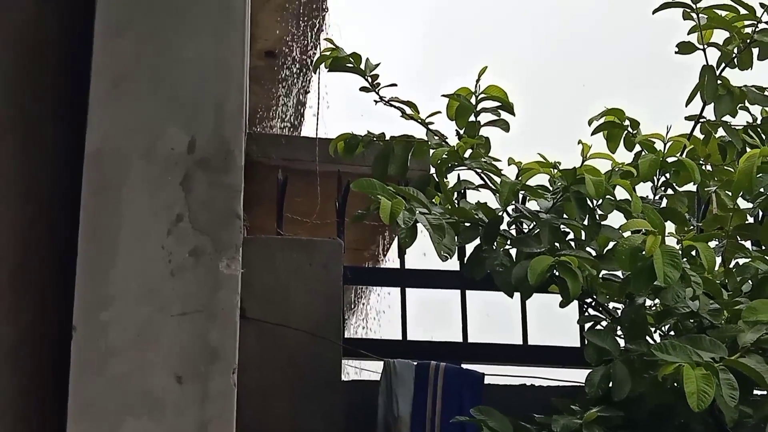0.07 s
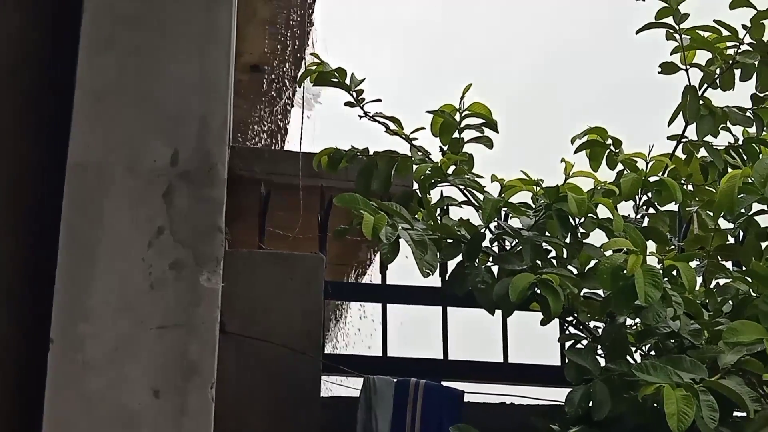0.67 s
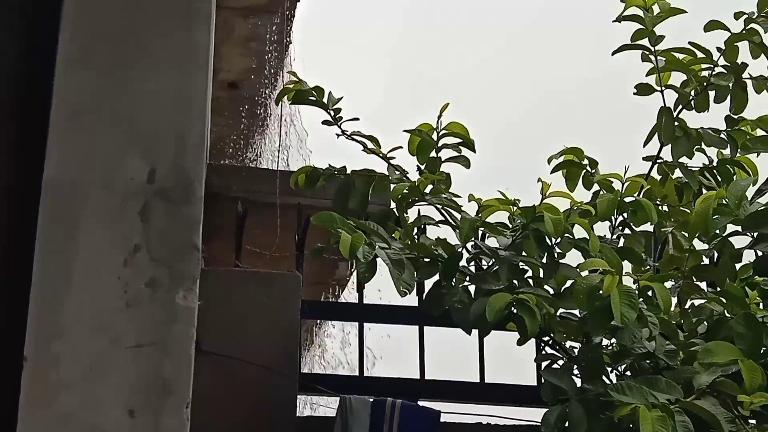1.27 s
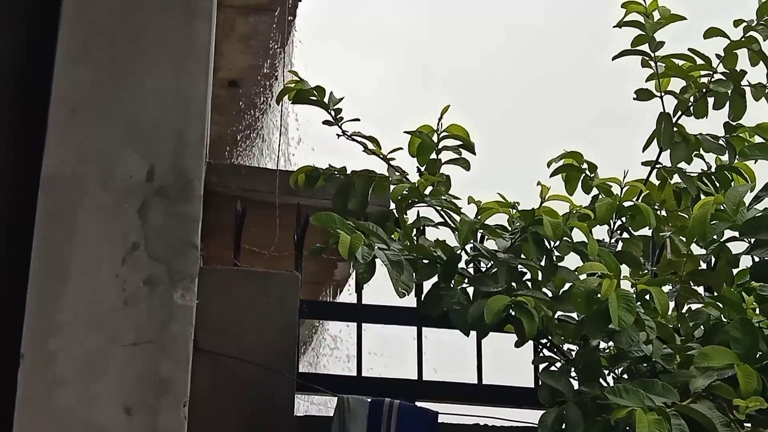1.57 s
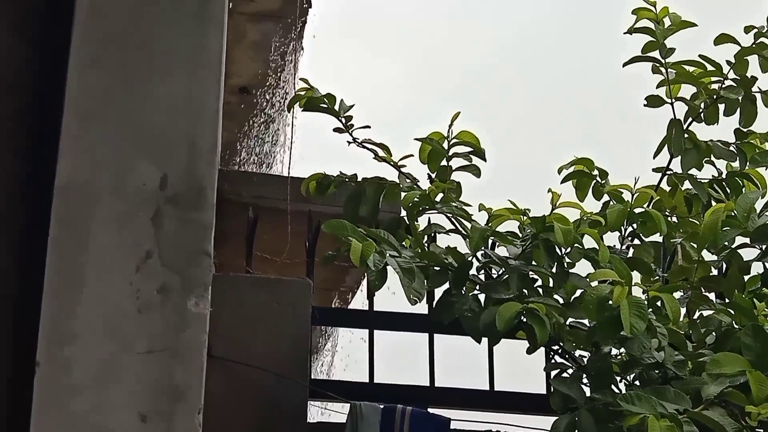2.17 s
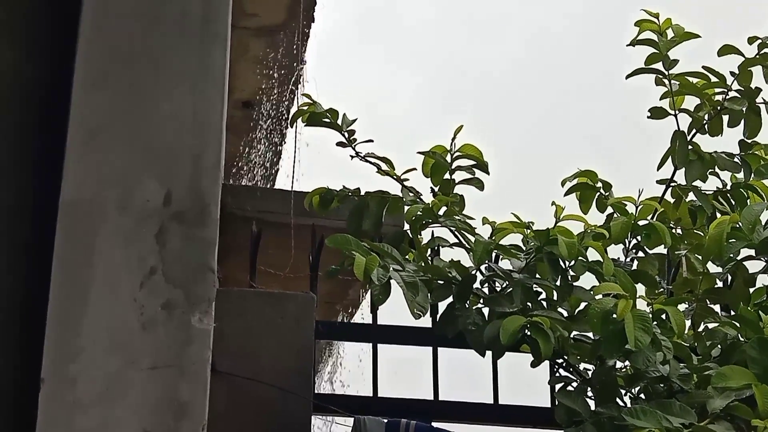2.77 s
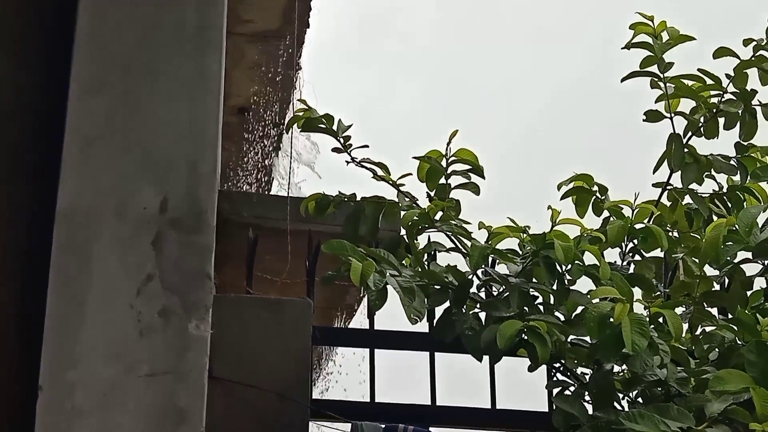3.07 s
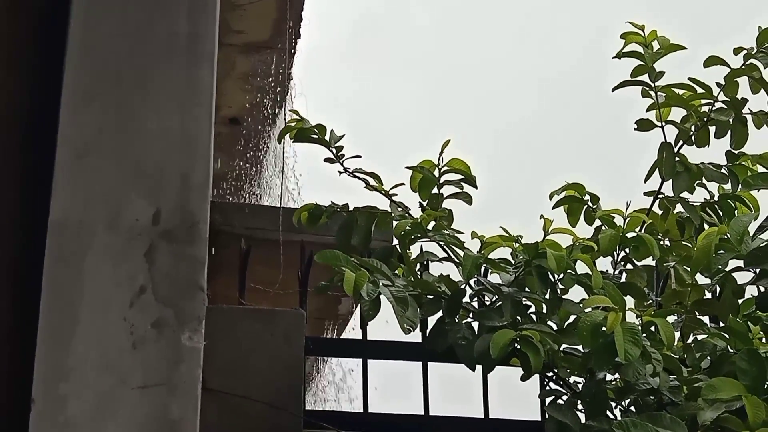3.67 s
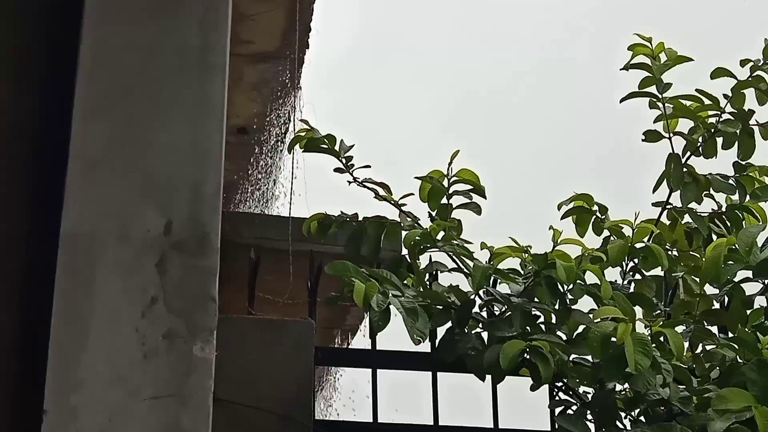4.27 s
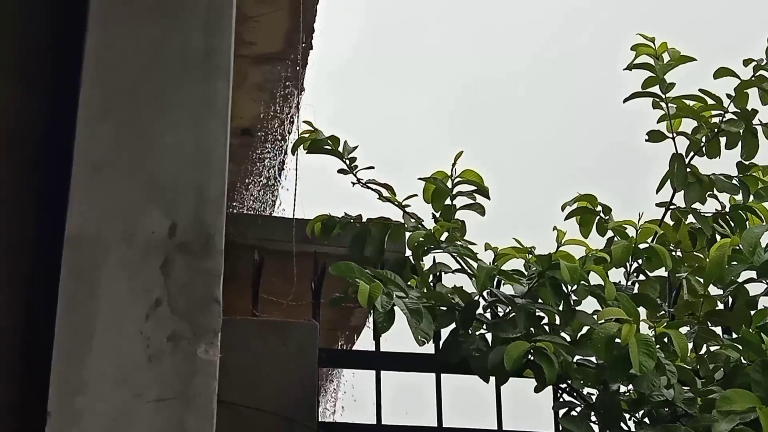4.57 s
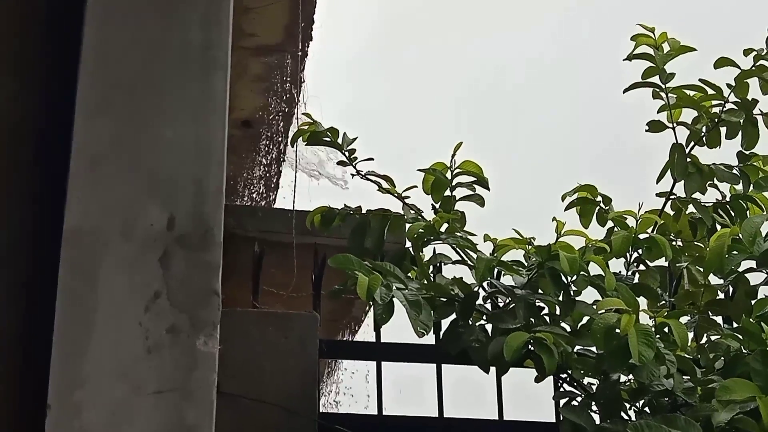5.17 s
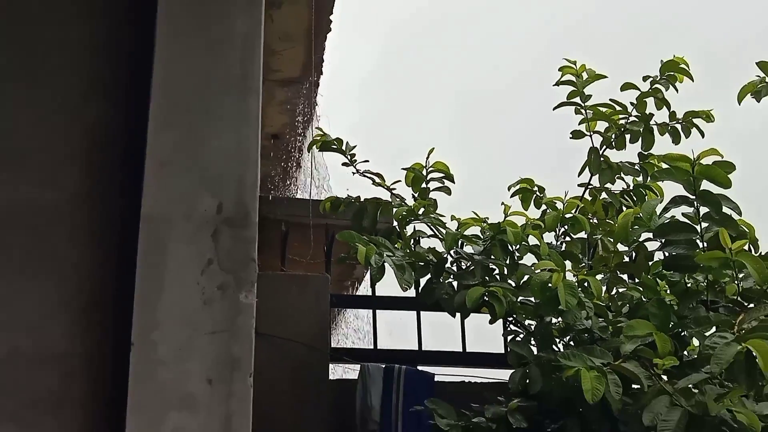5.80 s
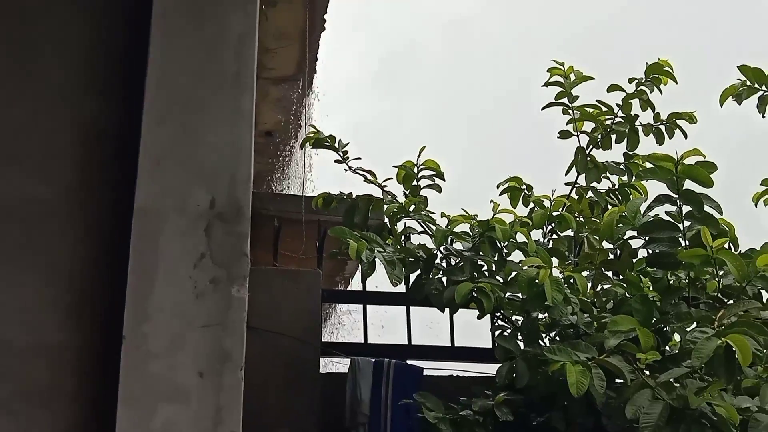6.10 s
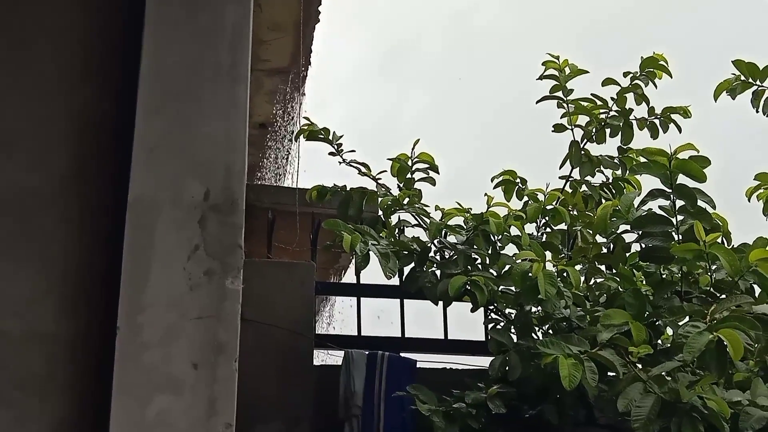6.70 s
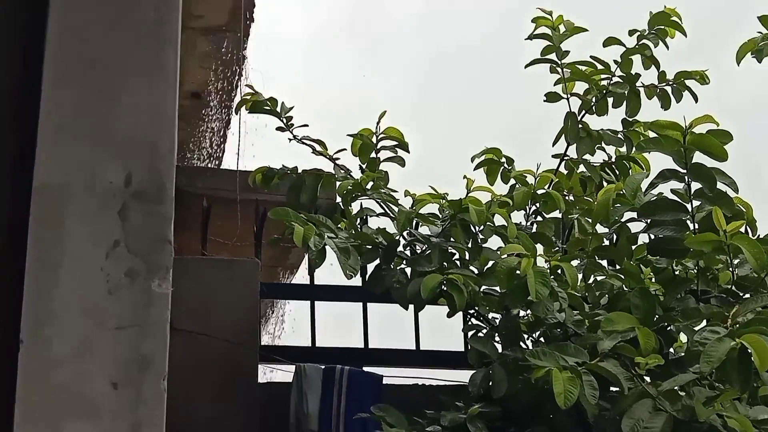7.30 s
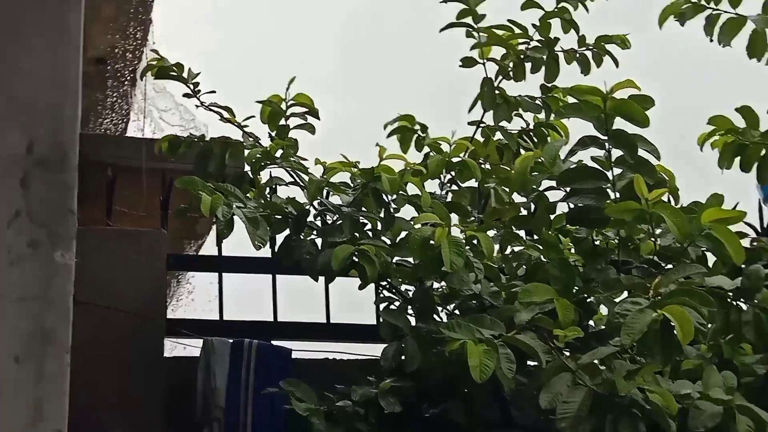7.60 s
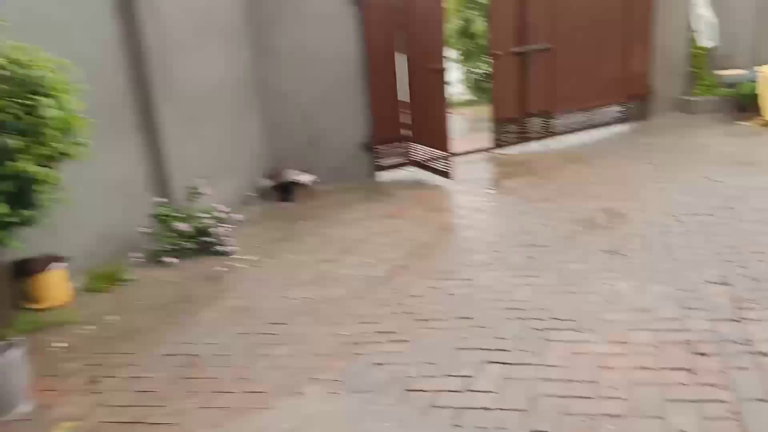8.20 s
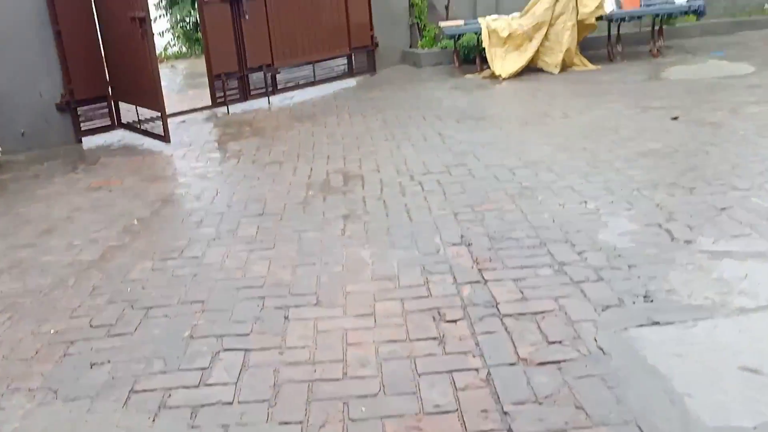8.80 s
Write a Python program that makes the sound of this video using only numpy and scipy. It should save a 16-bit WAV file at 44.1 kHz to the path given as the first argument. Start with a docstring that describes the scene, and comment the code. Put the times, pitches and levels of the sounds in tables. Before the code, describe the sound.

Beside a veranda, water pours off a roof in surges over steady rain. Each surge slaps and drums on wet paving, then ebbs into dripping, trickling and faint gurgles, with soft swishes before some of the splashes. Late on, a brief knock and rub sound on the handheld microphone as it turns to the open yard, where a last splash lands and raindrops plop brightly in puddles.

```python
"""Steady rain and ebbing run-off spatter and gurgle on the paving of a walled yard, beside a veranda.
From 1.5 s, about every 2.3 s, a sheet of water spills over the roof edge and drums on the paving,
then thins to spatter, a trickle and single fat drops; soft scraping swishes near 1 kHz come shortly
before a sheet lands. Near 8 s the phone is bumped and swung towards the open yard: the spatter is
closer and brighter, a last sheet lands and rain plops in the puddles."""
import sys
import numpy as np
from scipy import signal
from scipy.fft import rfft, irfft
from scipy.io import wavfile
from scipy.ndimage import uniform_filter1d

SR = 44100
rng = np.random.default_rng(int(sys.argv[2]) if len(sys.argv) > 2 else 0)


def file_out(sig):
    """Save sig as 16-bit WAV at sys.argv[1]."""
    # one column per channel
    cols = np.atleast_2d(sig).T
    # limit, then scale
    lim = np.clip(cols, -1, 1)
    pcm = np.round(lim * 32767).astype(np.int16)
    wavfile.write(sys.argv[1], SR, pcm)


N = 390285
TIME = np.arange(N) / SR
FREQ = np.arange(N // 2 + 1) * SR / N
TURN = np.clip((TIME - 8.03) / 0.21, 0, 1)  # 0 veranda, 1 facing the yard
SIDES = np.array([[1], [-1]])  # left, right
STEADY_DB = -54.1  # drip from the eaves between sheets
YARD_LAG_S, YARD_DIRECT = 0.0005, 0.55

# sheets of water: (time [s], pour length [s], landing delay [s], drum rise [s], collapse [dB/s],
# spatter [dB], boom [dB], drum [dB], slap [dB])
SPILLS = [(-0.75, 0.25, 0.04, 0.05, 40, -42, -62, -58, -53),
          (1.48, 0.32, 0.045, 0.05, 38, -41.7, -52.5, -49.8, -47.3),
          (3.8, 0.35, 0.055, 0.11, 42, -43.8, -58.5, -53, -51),
          (5.98, 0.3, 0.055, 0.04, 48, -42.3, -51, -48, -49.5),
          (8.28, 0.22, 0.01, 0.035, 42, -50, -49.5, -52, -58)]


def sheets(slap_rise_s=0.04):
    """A sheet of water breaks into lumps that slap down, drum and boom, then drains away."""
    # resonances of paving and walls: (frequency [Hz], width [Hz], relative level [dB])
    boom_modes = [(150, 50, -9), (205, 70, -5), (294, 38, 2.5), (365, 80, -3)]
    drum_modes = [(470, 130, -6.5), (630, 140, -3.5), (765, 46, 3.5), (870, 46, 2.2)]
    slap_modes = [(1336, 235, 1), (1520, 110, 1), (2016.4, 154, -4)]
    smack_modes = [(775, 70, 0), (875, 70, 0.5), (1360, 220, -2)]
    # single lumps smacking down: (time [s], length [s], level [dB])
    big_lumps = [(0.0, 0.12, -61), (1.692, 0.035, -43), (1.826, 0.015, -46.5), (4.005, 0.02, -52),
                 (6.095, 0.025, -48), (6.171, 0.011, -41), (6.262, 0.024, -41), (6.86, 0.025, -59),
                 (7.04, 0.03, -61), (8.61, 0.025, -52)]
    smack_gain = sum(undb(db) * swell(start_s, length_s, attack_s=0.008, fall_db_per_s=420)
                     for start_s, length_s, db in big_lumps)
    boom_gain = drum_gain = slap_gain = 0
    for start_s, length_s, delay_s, rise_s, fall_db_per_s, _, boom_db, drum_db, slap_db in SPILLS:
        land_s, hold_s = start_s + delay_s, length_s - delay_s
        bulk = pour(land_s, rise_s, hold_s, fall_db_per_s)
        front = pour(land_s, slap_rise_s, hold_s, fall_db_per_s)
        boom_gain = np.hypot(boom_gain, undb(boom_db) * bulk)
        drum_gain = np.hypot(drum_gain, undb(drum_db) * bulk)
        slap_gain = np.hypot(slap_gain, undb(slap_db) * front)
    lumps = splats(rate_hz=320, spread_db=1, decay_s=0.008, cap_db=7) * undb(wander(14))
    boom = resonate(centred(lumps, width=0.45), boom_modes)
    drum = resonate(centred(lumps, width=0.45), drum_modes)
    slap = resonate(arrive(lumps, lag_s=0.00014, direct=0.68), slap_modes)
    smack = resonate(arrive(rng.standard_normal((2, N)), lag_s=0.00007, direct=0.88), smack_modes)
    return boom * boom_gain + drum * drum_gain + slap * slap_gain + smack * smack_gain


def pour(start_s, rise_s, length_s, collapse_db_per_s, stream_db=-7.5, drain_db_per_s=21):
    """Gain of a sheet that swells, collapses and trails off as a thin stream."""
    sheet = crest(start_s, rise_s, length_s, collapse_db_per_s)
    stream = undb(stream_db) * crest(start_s, rise_s, length_s, drain_db_per_s)
    return np.maximum(sheet, stream)


def crest(start_s, rise_s, length_s, fall_db_per_s, round_s=0.04):
    """Gain of a surge that builds, rounds over and ebbs at a steady rate."""
    age_s = np.maximum(TIME - start_s, 0)
    ebb_s = round_s * np.logaddexp(0, (age_s - length_s) / round_s)
    return (1 - np.exp(-age_s / rise_s)) * undb(-fall_db_per_s * ebb_s)


def flow_db(rise_s=0.06, ebb_db_per_s=10.8, swing_start_s=7.97, swing_s=0.29, yard_db=7.2):
    """Run-off level: steady drip plus the remains of each sheet, louder towards the yard."""
    power = undb(STEADY_DB) ** 2
    for start_s, length_s, _, _, _, spatter_db, *_ in SPILLS:
        power = power + (undb(spatter_db) * crest(start_s, rise_s, length_s, ebb_db_per_s)) ** 2
    return 10 * np.log10(power) + yard_db * ramp(swing_start_s, swing_s)


def spatter(veranda_lag_s=0.00024, veranda_direct=0.22):
    """Run-off and rain hit wet paving; the colour follows the flow and the turn to the yard."""
    # spectra of thin flow, full flow and open yard: (frequency [Hz], relative level [dB])
    thin_spectrum = [(290, -59), (500, -31), (665, -26), (777, -19), (922, -20), (1030, -19), (1260, -11),
                     (1720, -10), (2050, -5), (2500, -0.5), (3500, -6.5), (3950, -14.5), (4670, -12),
                     (6670, -7.5), (7910, -24.5), (15000, -35)]
    full_spectrum = [(1000, -38), (1700, -11.5), (2080, 0.5), (2300, -5), (2810, 0), (3100, -1.5),
                     (3450, -3), (3950, -12), (4310, -13.5), (6490, -7.5), (6790, -8), (7860, -22),
                     (9010, -28.5), (15000, -32)]
    yard_spectrum = [(410, -30), (700, -23), (756, -20), (859, -25), (1020, -15), (1260, -21), (1450, -23),
                     (1950, -9.5), (2250, -6.5), (2600, -5.5), (3180, -9), (3430, -8.5), (4400, -11),
                     (6430, -6.5), (9300, -32), (15000, -32.5)]
    impacts = splats(rate_hz=750, spread_db=3.2, decay_s=0.0025, cap_db=12) * undb(0.8 * wander(11))
    ticks = splats(rate_hz=900, spread_db=3, decay_s=0.0018, cap_db=19) * undb(1.7 * wander(13))
    drops = colour(impacts, along([(3300, -0.5), (5000, -13), (9000, -13.5)]))
    drops += colour(ticks, along([(2500, -10), (4500, -0.5), (7500, 0.5), (10000, -8.5)]))
    drops += undb(-8.5) * splats(rate_hz=45, spread_db=4, decay_s=0.025, cap_db=8)
    drops += undb(-11) * bubbles()
    sprays = splats(rate_hz=14, spread_db=4, decay_s=0.045, cap_db=7)  # shattering drops
    drops += undb(-6) * colour(sprays, along([(2500, -12), (4500, -1), (7000, 0), (10000, -1)]))
    far_rain = undb(0.5) * rng.standard_normal((2, N))
    lag_s = veranda_lag_s + TURN * (YARD_LAG_S - veranda_lag_s)
    direct = veranda_direct + TURN * (YARD_DIRECT - veranda_direct)
    wet = arrive(walls(drops, wet_db=-6.5, t60_s=0.16) + far_rain, lag_s, direct)
    thin, full, yard = (unit(colour(wet, along(spectrum)))
                        for spectrum in (thin_spectrum, full_spectrum, yard_spectrum))
    level_db = flow_db()
    surge = np.clip((level_db + 47) / 7, 0, 1)
    sheltered = (1 - surge) * thin + surge * full
    return ports((1 - TURN) * sheltered + TURN * yard) * undb(level_db)


def bubbles(count=3000, low_hz=1699, high_hz=7010, decay_cycles=6.2, spread_db=2.5, glide=0.018):
    """Tiny bubbles ring briefly in the puddles, rising in pitch."""
    out, t = np.zeros((2, N + 1000)), np.arange(700) / SR
    for when, pitch, size, angle in rng.random((count, 4)):
        hz = low_hz * (high_hz / low_hz) ** pitch
        age = t * hz / decay_cycles
        gain = undb(-spread_db * np.log(size + 0.017))
        ring = gain * np.exp(-age) * np.sin(2 * np.pi * hz * t * (1 + glide * age))
        for port, delay in enumerate((20, int(40 * angle))):
            start = int(when * N) + delay
            out[port, start:start + len(t)] += ring
    return unit(out[:, :N])


def fat_drops(lag_s=0.00011, flutter_s=0.008, flutter_db=-10):
    """A big drop cracks, rings the puddle and sprays around that pitch; the walls answer twice."""
    # close drops: (time [s], level [dB], ring [Hz], spray decay [s], left minus right [dB])
    drops = [(0.159, -32.5, 2250, .005, -12), (0.209, -37, 2490, .003, -8), (0.6394, -38, 2450, .002, -8),
             (1.2222, -30.5, 1950, .0013, -12), (1.307, -38, 2250, .005, -8), (1.5017, -35, 2730, .004, 0),
             (1.5165, -26.5, 2100, .002, -2), (1.5358, -27.5, 1500, .004, -2),
             (1.7277, -30.5, 3800, .0015, 5), (1.756, -31.5, 2890, .003, -4), (1.785, -31, 2300, .003, -4),
             (1.8337, -31, 2720, .003, -4), (1.923, -35, 2050, .003, -5), (1.973, -34, 2100, .003, -5),
             (2.52, -37, 2600, .005, -3), (2.6215, -27, 3400, .003, 3), (2.6835, -38, 2100, .006, -6),
             (2.838, -30.5, 2150, .0025, -3), (3.127, -36.5, 3400, .002, 0), (3.481, -39, 2470, .004, -8),
             (3.5543, -38, 2440, .004, -8), (3.6117, -36, 3400, .0015, 0), (3.8238, -33, 2010, .003, -5),
             (3.866, -32.5, 2000, .003, -3), (3.9155, -33, 3500, .003, -2), (3.9275, -28.5, 2700, .002, -3),
             (3.943, -32.5, 1450, .006, -2), (4.0667, -33.5, 3340, .002, -3), (4.106, -30, 2770, .003, -4),
             (4.197, -32, 2800, .002, -3), (4.2752, -34.5, 3300, .003, -2), (4.4223, -35, 2080, .003, -5),
             (4.862, -31.5, 2200, .005, -2), (4.9825, -31, 2350, .003, -5), (5.8665, -35, 2450, .003, -7),
             (5.968, -39, 1400, .004, -3), (6.004, -29, 2000, .004, -7), (6.987, -37, 2870, .002, -4),
             (7.7059, -39, 2420, .004, -7), (7.9688, -38, 2400, .003, -5), (8.328, -31, 1820, .004, -4),
             (8.3572, -28.5, 2610, .003, -8), (8.5135, -23.5, 2150, .004, -3),
             (8.5793, -26, 2160, .002, -3), (8.669, -26, 5000, .003, 3), (8.833, -25, 5000, .002, 3)]
    # colouring by the walls: (frequency [Hz], gain [dB])
    wall_response = [(250, -22), (600, -8), (1100, -3), (1800, 0.5), (3400, 0.5), (4100, -7), (5500, -5),
                     (6700, 2), (8000, -13), (12000, -28)]
    out, t = np.zeros((2, N + SR)), TIME[:SR // 20]
    for start_s, db, hz, spray_s, lean_db in drops:
        band = signal.butter(4, [0.52 * hz, min(2.15 * hz, 9000)], "band", fs=SR, output="sos")
        spray = signal.sosfilt(band, rng.standard_normal((2, len(t)))) * np.exp(-t / spray_s)
        ring = np.exp(-t / (1.1 * spray_s)) * np.sin(2 * np.pi * hz * (t - np.array([[0], [lag_s]])))
        attack = 1 - np.exp(-2 * t / spray_s)
        hit = (ring + 4.488 * spray) * attack * pan(lean_db)
        hit *= undb(db) / np.abs(hit.mean(0)).max()
        for trip in range(3):
            start = int((start_s + trip * flutter_s) * SR)
            out[:, start:start + len(t)] += hit * undb(trip * flutter_db)
    return walls(colour(out[:, :N], along(wall_response)), wet_db=-9, t60_s=0.12)


def puddles(pitch_hz=2170, width_hz=660, level_db=-42.5):
    """Rain plops into standing water, heard once the phone faces the yard."""
    drops = arrive(splats(rate_hz=420, spread_db=3, decay_s=0.003, cap_db=10), YARD_LAG_S, YARD_DIRECT)
    ring = hollow(drops, pitch_hz * (1 + 0.025 * wander(20)), width_hz)
    return ring * ramp(start_s=8.32, length_s=0.2) * undb(level_db) * pan(lean_db=-6)


def trickle(pitch_hz=2500, width_hz=480, level_db=-56.3):
    """A thin stream from the eaves sings in its puddle; pitch and strength shift as it sways."""
    drips = splats(rate_hz=600, spread_db=2.2, decay_s=0.002, cap_db=7)
    song = hollow(drips, pitch_hz * (1 + 0.022 * wander(16)), width_hz)
    return song * undb(level_db + 2 * wander(15)) * pan(lean_db=-8)


def gurgles_and_swishes():
    """Gliding noise bands: short gurgles, and soft scraping swishes near 1 kHz before a sheet lands."""
    # gurgles and swishes: (time [s], length [s], level [dB], pitch [Hz], glide [octaves/s], width [Hz])
    glides = [(0.01, 0.13, -63.5, 320, -1, 70), (0.22, 0.05, -65, 860, 0, 130),
              (0.46, 0.1, -72, 135, 0, 70), (0.62, 0.4, -64.5, 1200, -0.8, 340),
              (0.63, 0.06, -70, 570, 0, 90), (0.73, 0.04, -70, 270, 0, 70),
              (1.13, 0.15, -67, 170, 0.5, 110), (1.15, 0.13, -68, 720, -2.5, 200),
              (1.56, 0.1, -54, 300, 1, 70), (1.77, 0.08, -53, 280, -0.5, 80), (1.98, 0.1, -60, 600, 0, 150),
              (2.19, 0.06, -55.5, 305, -1.0, 130), (2.28, 0.18, -63, 790, 0, 160),
              (2.45, 0.25, -68, 440, 0.2, 90), (2.96, 0.2, -62, 1060, -0.6, 300),
              (2.97, 0.04, -70, 370, 0, 140), (3.05, 0.16, -68, 700, -0.8, 130),
              (3.24, 0.06, -64, 980, -1, 300), (3.33, 0.04, -71, 320, 0, 120),
              (3.365, 0.06, -47, 2640, 0.05, 60), (3.61, 0.03, -59, 1550, 0, 180),
              (3.78, 0.09, -69, 620, 0, 60), (4.42, 0.05, -62, 250, 0, 170), (4.6, 0.06, -68, 340, -4, 170),
              (5.05, 0.1, -70, 770, 0, 90), (5.5, 0.3, -68, 660, 0.3, 170),
              (5.56, 0.27, -62.5, 950, 0.5, 230), (5.6, 0.2, -68.5, 300, 0, 130),
              (6.06, 0.09, -52, 305, -0.3, 80), (6.21, 0.09, -53, 280, -0.5, 110),
              (6.62, 0.2, -62, 720, 0, 260), (6.84, 0.07, -59, 280, -1, 160),
              (7.12, 0.15, -66, 790, 0, 120), (7.38, 0.1, -69, 300, 0, 90)]
    out = np.zeros((2, N))
    grains = centred(splats(rate_hz=200, spread_db=2, decay_s=0.012, cap_db=8), width=0.3)
    for start_s, length_s, db, hz, octaves_per_s, width_hz in glides:
        span = slice(int(start_s * SR), int((start_s + length_s + 0.5) * SR))
        pitch_hz = hz * 2 ** (octaves_per_s * (TIME[span] - start_s))
        gain = undb(db) * swell(start_s, length_s, attack_s=0.03, fall_db_per_s=130)
        out[:, span] += hollow(grains[:, span], pitch_hz, width_hz) * gain[span]
    return ports(out)


def handling():
    """Fingers knock and rub the case near the right port; longer contact gives a duller thud."""
    # finger knocks: (time [s], level [dB], contact [s])
    bumps = [(7.926, -41, 0.0023), (7.939, -38, 0.0024), (8.023, -36, 0.004), (8.0434, -23.5, 0.00023),
             (8.335, -37, 0.0017)]
    # modes of the case: (frequency [Hz], relative level [dB], t60 [s])
    case_modes = [(79, -28, 0.078), (345, -2.5, 0.02), (534, 3, 0.0076), (790, 0.5, 0.007),
                  (1650, -3, 0.0068), (2440, -0.5, 0.0043), (3700, -1, 0.0029)]
    # slides of the hand: (time [s], length [s], level [dB])
    rubs = [(7.915, 0.03, -53), (8.0, 0.2, -57.5), (8.31, 0.05, -52), (8.57, 0.17, -59.5)]
    # rustle of hand on case: (frequency [Hz], relative level [dB])
    rustle_spectrum = [(25, -23), (75, -0.5), (140, 0), (300, -4), (600, -8.5), (1200, -16), (3000, -50)]
    knocks, t = np.zeros(N + SR), TIME[:SR // 8]
    case = sum(undb(db - 60 * t / t60_s) * np.sin(2 * np.pi * hz * t) * (-1) ** k
               for k, (hz, db, t60_s) in enumerate(case_modes))
    for start_s, db, contact_s in bumps:
        push = t * np.exp(-4 * t / contact_s)
        knock = signal.fftconvolve(case, push)[:len(t)]
        start = int(start_s * SR)
        knocks[start:start + len(t)] += undb(db) * knock / np.abs(knock).max()
    slips = centred(splats(rate_hz=230, spread_db=5, decay_s=0.011, cap_db=5), width=0.38)
    grip = np.max([undb(db) * swell(start_s, length_s, attack_s=0.025, fall_db_per_s=45)
                   for start_s, length_s, db in rubs], axis=0)
    rustle = unit(colour(slips, along(rustle_spectrum))) * grip
    return knocks[:N] * undb([[-8], [3.5]]) + rustle * undb([[-2], [1.5]])


def babble(uneven_db=6):
    """Small glugs of several sizes come and go independently in the draining water."""
    # glug resonances: (pitch [Hz], width [Hz], level [dB])
    bands = [(165, 90, -83), (290, 90, -82), (430, 130, -81), (610, 110, -80), (790, 110, -78.5),
             (1330, 260, -71)]
    glugs = centred(splats(rate_hz=160, spread_db=2, decay_s=0.012, cap_db=8), width=0.45)
    return sum(hollow(glugs, np.full(N, hz), width_hz) * undb(db + uneven_db * np.tanh(wander(13)))
               for hz, width_hz, db in bands)


def plops(count=200, low_hz=220, high_hz=1200, decay_s=0.016, spread_db=3.2, glide_per_s=1.2):
    """Large bubbles burst in the run-off and ring with rising pitch, louder in strong flow."""
    out, t = np.zeros((2, N + SR)), TIME[:SR // 10]
    envelope = np.exp(-t / decay_s) * (1 - np.exp(-4 * t / decay_s))
    for when, pitch, size, angle in rng.random((count, 4)):
        hz = low_hz * (high_hz / low_hz) ** pitch
        phase = 2 * np.pi * hz * t * (1 + glide_per_s * t / 2)
        ring = np.sin(phase + 0.7 * (2 * angle - 1) * SIDES)
        start = int(when * N)
        out[:, start:start + len(t)] += undb(-spread_db * np.log(size + 0.04)) * envelope * ring
    return unit(out[:, :N]) * undb(-81.5 + 0.6 * (flow_db() - STEADY_DB))


def rumble(level_db=-73.3, wander_db=1.6):
    """Low, wavering murmur from beyond the walls."""
    # surroundings: (frequency [Hz], relative level [dB])
    spectrum = [(15, -52), (25, -32), (72, 0), (100, -5), (130, -4), (224, -10.5), (301, -8.5), (367, -11),
                (397, -15), (460, -10), (547, -16), (600, -8.5), (780, -23), (1320, -120)]
    noise = centred(rng.standard_normal((2, N)), width=0.3)
    return unit(colour(noise, along(spectrum))) * undb(level_db + wander_db * wander(11))


def walls(x, wet_db, t60_s):
    """Close walls add a short diffuse tail."""
    t = TIME[:SR // 2]
    tail = rng.standard_normal((2, len(t))) * undb(-60 * t / t60_s) * (t > 0.004)
    tail /= np.sqrt(np.sum(tail ** 2, axis=1, keepdims=True))
    return x + undb(wet_db) * signal.fftconvolve(x, tail, axes=1)[:, :N]


def tilt(x, from_hz=1100, to_hz=1520, width_hz=330, depth=0.85):
    """Direct and reflected sound cancel in a band that rises as the phone tilts to the paving."""
    notch_hz = from_hz + (to_hz - from_hz) * ramp(start_s=8.28, length_s=0.2)
    return x - depth * TURN * moving_band(x, notch_hz, width_hz, order=1)


def ports(x):
    """The phone's two ports take unequal shares of each frequency."""
    # port balance: (frequency [Hz], left minus right [dB])
    balance = [(900, 0), (1500, -2), (2200, -6.5), (2800, -6.5), (3400, -3.5), (4300, 4.5), (5500, 0.5),
               (6600, 9), (8200, 3), (12000, 1)]
    lean_db = along(balance)
    excess_db = 10 * np.log10(np.cosh(lean_db * np.log(10) / 10) / 2 + 0.5) / 2
    return colour(x, SIDES * lean_db / 2 - excess_db)


def arrive(x, lag_s, direct):
    """The direct share reaches the right port after the left; the rest is diffuse."""
    lag = np.round(lag_s * SR).astype(int)
    late = x[0][np.maximum(np.arange(N) - lag, 0)]
    return np.array([x[0], direct * late + np.sqrt(1 - direct ** 2) * x[1]])


def splats(rate_hz, spread_db, decay_s, cap_db):
    """Decaying noise bursts at random times, many small and few large."""
    size_db = cap_db * np.tanh(spread_db * rng.exponential(size=N) / cap_db)
    hits = undb(size_db) * (rng.random(N) < rate_hz / SR)
    lean = undb(1.23 * rng.standard_normal((2, N)))
    energy = signal.lfilter([1], [1, -np.exp(-2 / (decay_s * SR))], (hits * lean) ** 2 + 1e-12)
    return unit(np.sqrt(energy) * rng.standard_normal((2, N)))


def resonate(x, modes, low_cut_hz=90):
    """Parallel steep-sided resonances with a bass cut, at unit rms."""
    power = sum(undb(db) ** 2 / (1 + ((FREQ - hz) / (width_hz * 0.89)) ** 2) ** 2
                for hz, width_hz, db in modes)
    low_cut = (1 - np.exp(-(FREQ / low_cut_hz) ** 2)) ** 2
    return unit(colour(x, 10 * np.log10(power * low_cut + 1e-8)))


def hollow(x, hz, width_hz):
    """One resonance with a movable centre, at unit rms."""
    return unit(moving_band(x, hz, width_hz, order=2))


def moving_band(x, hz, width_hz, order):
    """Band-pass with a centre per sample: shift down, low-pass, shift back."""
    spin = np.exp(2j * np.pi * np.cumsum(hz) / SR)
    low_pass = signal.butter(order, width_hz / 2, fs=SR, output="sos")
    return 2 * (signal.sosfilt(low_pass, x / spin) * spin).real


def colour(x, gain_db):
    """Minimum-phase filter with a gain per FREQ bin."""
    fold = np.where(np.arange(N) < N // 2, 2., 0.)
    fold[0] = 1
    cepstrum = irfft(np.log(undb(gain_db)), N) * fold
    return irfft(rfft(x) * np.exp(rfft(cepstrum)), N)


def along(points):
    """Interpolate (frequency [Hz], level [dB]) onto FREQ, on a log axis."""
    hz, db = np.transpose(points)
    return np.interp(np.log(FREQ + 1), np.log(hz), db)


def swell(start_s, length_s, attack_s, fall_db_per_s):
    """Gain that rises, holds, then fades at a steady rate."""
    return ramp(start_s, attack_s) * undb(-fall_db_per_s * np.maximum(TIME - start_s - length_s, 0))


def ramp(start_s, length_s):
    """Linear rise from 0 to 1."""
    return np.clip((TIME - start_s) / length_s, 0, 1)


def wander(rate_hz):
    """Smooth random drift, spread near 1."""
    hold = int(SR / rate_hz)
    steps = np.repeat(rng.standard_normal(N // hold + 1), hold)
    return 1.2 * uniform_filter1d(steps, hold)[:N]


def centred(x, width):
    """Mid/side mix: low sound is nearly the same at both ports."""
    return x[0] + width * x[1] * SIDES


def pan(lean_db):
    """Stereo gains for a left-minus-right level."""
    return undb(SIDES * lean_db / 2)


def unit(x):
    """Scale stereo to a mid rms of 1."""
    return x / np.sqrt(np.mean(x.mean(0) ** 2))


def undb(db):
    """Decibels to gain."""
    return 10 ** (np.asarray(db) / 20)


def scene():
    """Water through the tilt notch, plus handling and rumble."""
    water = (spatter() + trickle() + puddles() + sheets()
             + gurgles_and_swishes() + babble() + plops() + fat_drops())
    return tilt(water) + handling() + rumble()


def record(dry):
    """The phone cuts the top."""
    top_hz = 15550
    return signal.sosfilt(signal.ellip(10, 0.2, 70, top_hz, fs=SR, output="sos"), dry)


dry = scene()
out = record(dry)
file_out(out)
```